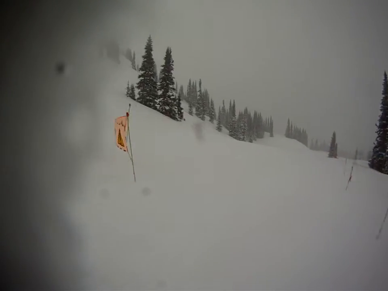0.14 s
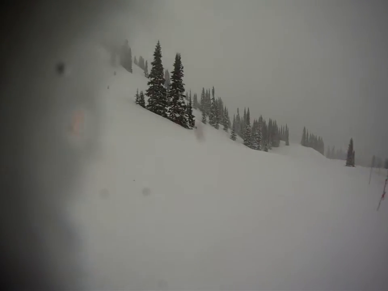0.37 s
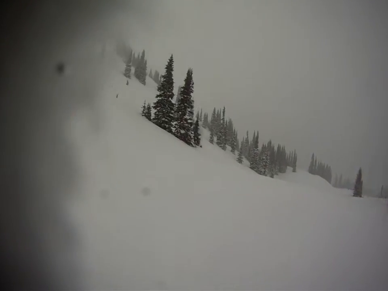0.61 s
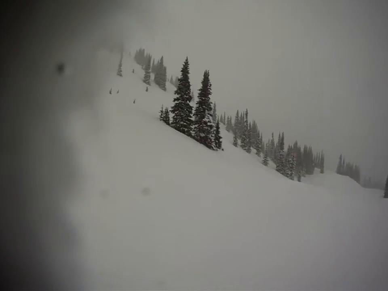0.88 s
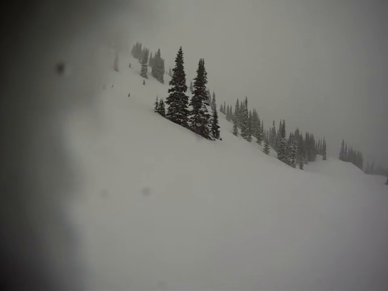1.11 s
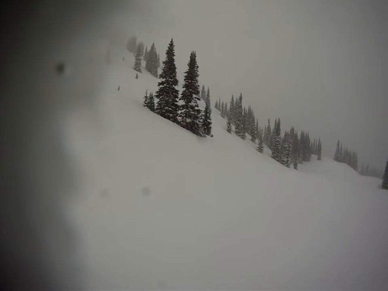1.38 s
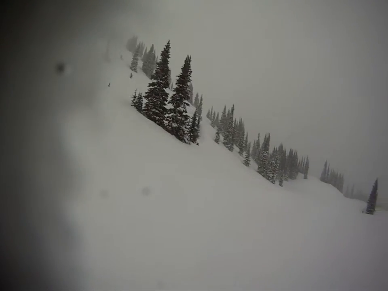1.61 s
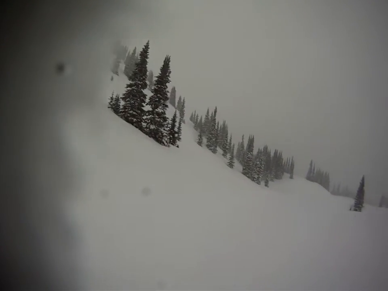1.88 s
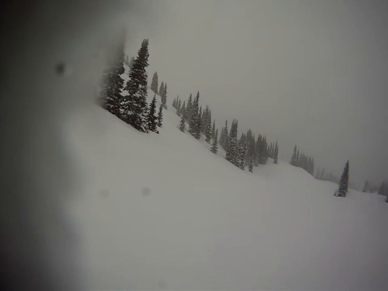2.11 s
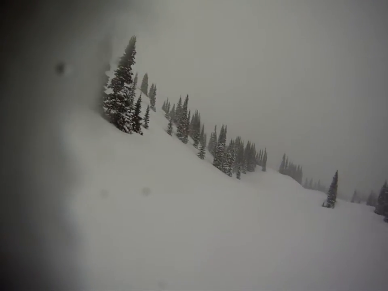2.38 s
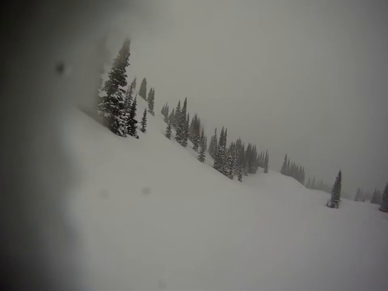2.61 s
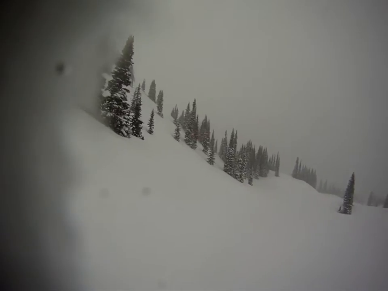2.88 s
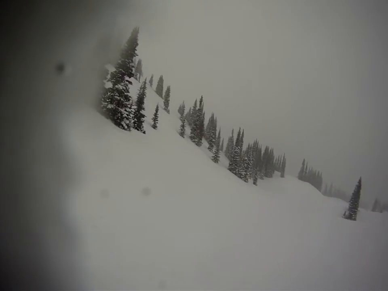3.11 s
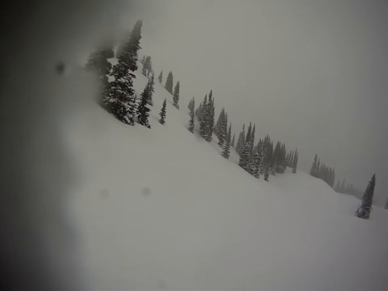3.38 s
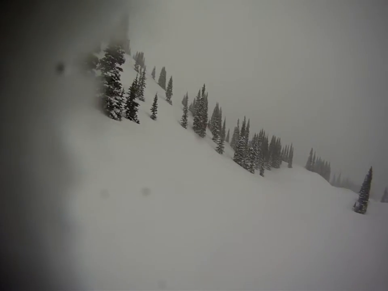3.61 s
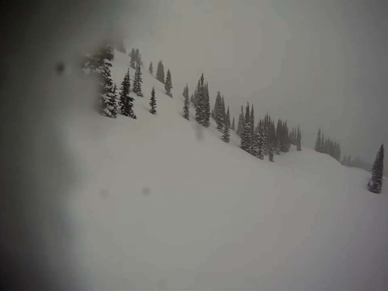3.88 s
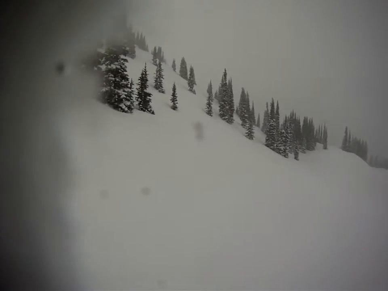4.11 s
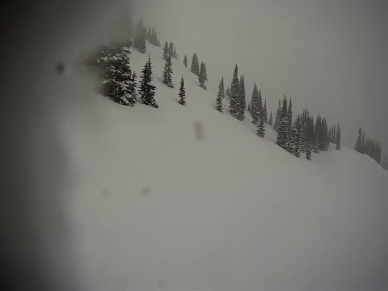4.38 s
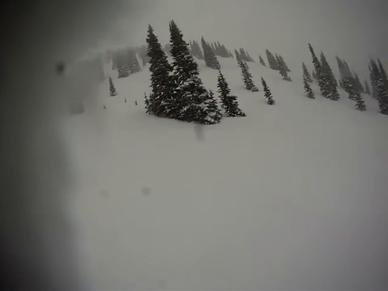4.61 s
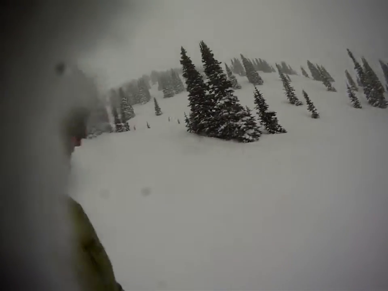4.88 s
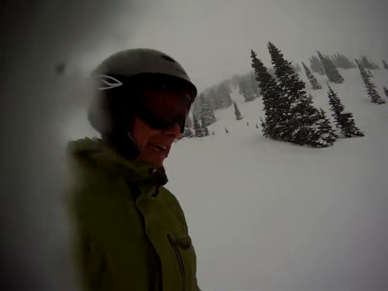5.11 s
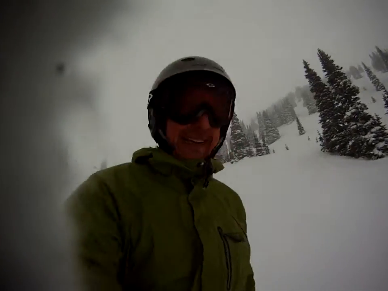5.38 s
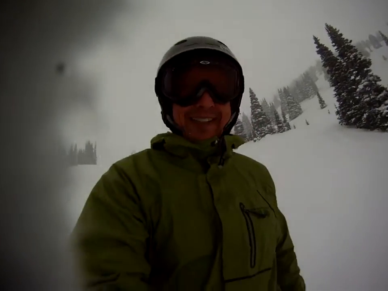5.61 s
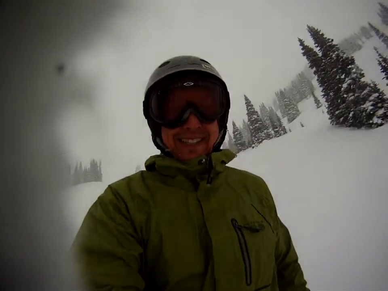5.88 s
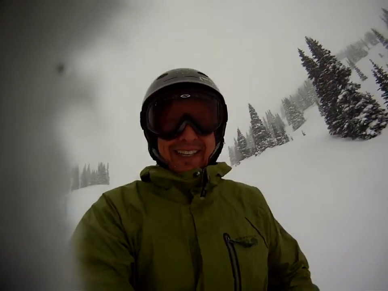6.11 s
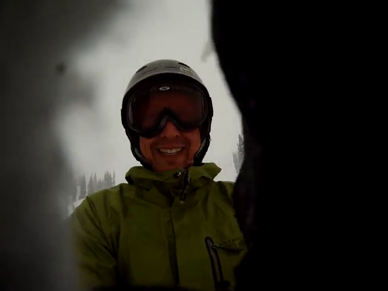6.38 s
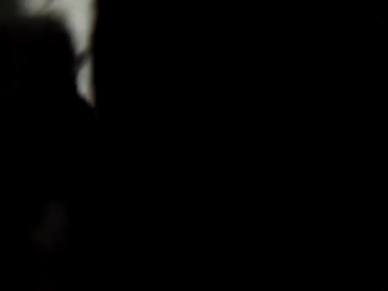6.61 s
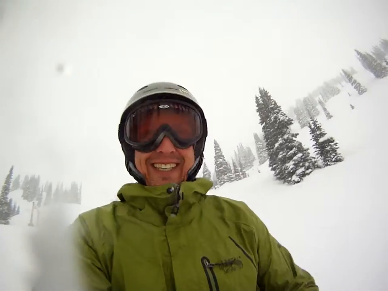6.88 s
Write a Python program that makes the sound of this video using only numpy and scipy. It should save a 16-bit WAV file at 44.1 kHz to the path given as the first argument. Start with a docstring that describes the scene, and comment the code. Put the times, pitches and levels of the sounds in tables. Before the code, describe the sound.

Faint gritty rubbing, small plastic ticks and low wind rumble on an encased camera, then a sudden loud knock and rough glove scrapes.

```python
"""Boxed camera on a snowy slope

A small camera in a closed plastic case is carried down a snowy slope. Snow and a glove rub and tick on the
shell, made from noise and clicks ringing its resonances; late on the glove wipes the lens in noisy strokes.
Wind, and late on the low shake of the wipe, rumble as bands of low noise; a faint frame buzz of regular dips
lies below. The sound chip samples slowly and holds each value, so the shell's resonances return as mirror
images in the treble."""
import sys
import numpy as np
from scipy import signal
from scipy.io import wavfile

SR = 44100
rng = np.random.default_rng(int(sys.argv[2]) if len(sys.argv) > 2 else 0)


def makeup_ratio(level_db):
    """Linear amplitude ratio for a level in decibels (20 dB per factor of ten)."""
    decades = np.asarray(level_db, float) / 20
    return 10 ** decades


def wav_record(signal):
    """Record a signal, one row per channel, as 16-bit PCM in the file named by sys.argv[1]."""
    frames = np.transpose(np.atleast_2d(signal))
    bounded = np.clip(frames, -1, 1)
    # unit amplitude maps onto the largest positive 16-bit level
    quanta = np.round(bounded * 32767).astype(np.int16)
    wavfile.write(sys.argv[1], SR, quanta)


N = 308700   # samples: 7 s

# Steady rubbing on the shell, joined by straight lines: start_s, level_db (rms)
STEADY_RUBBING = [(0, -38.5), (.3, -39), (.6, -41), (.98, -42.5), (1.25, -43), (1.55, -47), (1.93, -50),
                  (2.08, -43.5), (2.3, -46), (2.6, -44), (3.0, -42.5), (3.35, -45), (3.75, -45.5),
                  (4.15, -46.5), (4.4, -50), (5.42, -42.5), (5.5, -45), (5.95, -47.5), (6.4, -42.5),
                  (7, -42.5)]
# The glove leans on the shell and the rubbing jumps up: start_s, length_s, start_level_db, end_level_db
LEANS_ON_SHELL = [(0.775, 0.15, -38, -37), (2.31, 0.1, -50, -42), (3.062, 0.12, -43.5, -40),
                  (3.52, .14, -55, -42), (3.792, 0.25, -44, -40), (4.446, 0.065, -44, -41),
                  (4.507, 0.32, -34.5, -36.5), (4.849, 0.57, -37, -37.5), (5.569, .17, -43.5, -31.5),
                  (5.74, 0.087, -34.5, -44), (6.109, .21, -47, -38.5), (6.495, .11, -37, -31.5),
                  (6.619, 0.15, -26, -20.5)]


def rub_level():
    """Steady rubbing and the leans add in power, as separate noises do; the result is in dB."""
    t = np.arange(N) / SR
    edge_s = 0.005
    power = makeup_ratio(2 * in_time(STEADY_RUBBING)[0])
    for start_s, length_s, start_db, end_db in LEANS_ON_SHELL:
        end_s = start_s + length_s
        on = (np.tanh((t - start_s) / edge_s) - np.tanh((t - end_s) / edge_s)) / 2
        lean_db = np.interp(t, [start_s, end_s], [start_db, end_db])
        power = power + on ** 2 * makeup_ratio(2 * lean_db)
    return 10 * np.log10(power)


def rubbing():
    """Snow dust and cloth on the shell: fluttering hiss, a dense fine crackle and a few larger grains."""
    rub_db = rub_level()
    # above -31 dB the pressure damps the upper modes and hides the crackle
    heavy_db = np.maximum(rub_db + 31, 0)
    # the share of the upper modes wanders as the contact moves
    upper_db = 0.5 + 1.5 * drift(2.7) - 2.5 * heavy_db
    weight_db = 0.37 * np.clip(rub_db + 39.5, -8, 10)

    hiss = rng.standard_normal(N) * makeup_ratio(2.0 * drift(76))
    fine = flakes(1600 * makeup_ratio(6 * drift(40)), spread_db=6.5)
    large = flakes(70 * makeup_ratio(4 * drift(10)), spread_db=6.5)
    ringing = rms_one(shell(hiss, np.clip(upper_db, -20, 6), weight_db, patchy_db=1.15))
    crackle = makeup_ratio(-4.0) * fine + makeup_ratio(-7) * large
    mixed = ringing + makeup_ratio(-1.1 * heavy_db) * crackle
    return makeup_ratio(rub_db) * rms_one(mixed)


# Resonances of the shell, in the order low, main, upper, top and a fifth one:
# pitch_hz, width_hz, level_db (relative, when rubbed, before any lift)
SHELL_MODES = [(1224, 900, -3), (2170, 458, 0.5), (3493, 350, -10), (4804, 1380, -12.5), (1715, 670, -1)]


def shell(drive, upper_db, weight_db, patchy_db):
    """A rubbing force rings all modes, neighbours in opposite sign, each wavering; weight wakes the fifth."""
    out = 0
    # the top mode follows only part of the change in the upper one
    lifts_db = [0, 0, upper_db, 0.44 * upper_db, weight_db]
    signs = [1, 1, -1, 1, -1]
    for (pitch_hz, width_hz, level_db), lift_db, sign in zip(SHELL_MODES, lifts_db, signs):
        ringing = rms_one(mode(drive, pitch_hz, width_hz))
        waver_db = patchy_db * drift(8.5)
        out = out + sign * makeup_ratio(level_db + lift_db + waver_db) * ringing
    return stiff(out)


def flakes(per_s, spread_db):
    """Grains land at different spots, so each rings the modes in its own proportion."""
    hits = grains(per_s, spread_db)
    out = 0
    for pitch_hz, width_hz, level_db in SHELL_MODES:
        struck = contact(hits * rng.standard_normal(N), pitch_hz, spread=1.46)
        # the modes are more even here than when rubbed
        out = out + makeup_ratio(0.32 * level_db) * rms_one(mode(struck, pitch_hz, width_hz))
    return rms_one(stiff(out))


def grains(per_s, spread_db):
    """Stick-slip: random clicks, most small, a few large."""
    sizes = makeup_ratio(spread_db * np.minimum(rng.exponential(1, N), 3.2))
    signs = rng.choice([-1, 1], N)
    landed = rng.random(N) < per_s / SR
    return rms_one(sizes * signs * landed)


# Ticks on the shell: start_s, peak_db (hardest-struck mode, before scatter), spot_hz (pitch of the spot struck),
# fall_below_db_per_octave, fall_above_db_per_octave (how fast the modes weaken away from the spot)
SHELL_TICKS = [(0.1182, -24, 2040, 15, 12), (0.1503, -21, 2300, 15, 12), (0.2209, -24, 2200, 10, 16),
               (0.42, -25, 2290, 12, 8.2), (0.5046, -22.5, 2170, 6.7, 16), (0.6798, -21, 3300, 9, 24),
               (1.026, -29.5, 1980, 5.3, 9.1), (1.1713, -19.5, 3360, 13, 25), (1.2331, -13, 3530, 13.6, 29),
               (1.3988, -33.5, 2070, 7.8, 20), (1.587, -29, 2300, 5.1, 9.4), (1.727, -31, 2240, 10, 8.5),
               (2.2298, -29, 2290, 10, 8), (2.3106, -26, 2310, 15, 4), (2.3281, -25, 2190, 9.4, 7.9),
               (2.3527, -24, 2150, 7.6, 12), (2.37, -27.5, 2290, 8.6, 12), (2.388, -26, 3290, 10, 12),
               (2.4255, -23, 2120, 10, 6.7), (2.666, -28, 2060, 5, 16), (2.7453, -24.5, 3390, 17, 25),
               (2.8974, -27, 2070, 5.5, 11), (3.0397, -23.5, 3200, 6.6, 23), (3.1024, -19.5, 2120, 10, 16),
               (3.1963, -29.5, 1210, 10, 9.9), (3.2716, -22, 2240, 15, 20), (3.292, -30.5, 3280, 8, 22),
               (3.4514, -23, 3260, 4.7, 13), (3.5694, -20, 1960, 14.5, 15.6), (3.8204, -23.5, 3470, 11, 17),
               (3.9947, -26, 2220, 6.2, 12), (4.1026, -23.5, 1120, 10, 8.4), (4.1387, -26, 2050, 11, 8.2),
               (4.5248, -19, 1960, 15, 26), (4.7533, -23.5, 2400, 12, 10), (4.78, -22.5, 2210, 11, 8.4),
               (4.801, -38, 2010, 10, 12), (4.8412, -21, 2270, 8.9, 4.8), (4.8705, -25, 3560, 13, 10),
               (4.9023, -27, 1910, 10, 9.8), (4.9139, -11.5, 1950, 10, 4.2),
               (4.9766, -18.5, 3550, 3.9, 9.8), (5.3637, -18, 2080, 15, 14), (5.5566, -27.5, 2310, 14, 12),
               (5.7359, -11.5, 2280, 17, 9.2), (5.768, -13, 2240, 17, 9.4), (5.9162, -23.5, 2300, 14, 9.6),
               (6.0518, -12, 2260, 15, 10.3), (6.2107, -25.5, 1200, 10, 5.2),
               (6.2559, -21.5, 2110, 14, 8.9), (6.2707, -19, 2070, 14, 7.5), (6.3012, -21.5, 2260, 20, 9.9),
               (6.471, 3, 2130, 9.2, 13), (6.4888, -21, 2020, 11, 9.3), (6.557, -10.5, 2140, 14, 12),
               (6.5638, -11.5, 2110, 13, 8.6), (6.5842, -16.5, 2160, 7.6, 13), (6.6276, -11, 1090, 10, 8.6),
               (6.757, -8, 1820, 10, 15), (6.7623, -21, 1860, 10, 12), (6.766, -9, 1850, 13, 17),
               (6.7707, -15, 2160, 9, 16), (6.837, -20, 2210, 11.5, 16), (0.4628, -21.5, 5000, 3.2, 12),
               (0.5397, -26, 4240, 4, 14), (0.9053, -26.5, 4840, 5, 12), (1.9944, -31, 4830, 4.7, 12),
               (2.2114, -27.5, 4300, 3.4, 12), (3.1472, -26.5, 4210, 4, 13), (4.3944, -28.5, 4770, 4.1, 11)]


def ticks():
    """Each tick strikes the modes near its spot hardest and chatters once."""
    start_s, peak_db, spot_hz, below_db, above_db = np.transpose(SHELL_TICKS)
    at = np.round(start_s * SR).astype(int)
    chatter_at = at + round(0.0007 * SR)
    scatter_db, spread = 0.5, 1.183   # spread: ratio from the mode's pitch to the edge of the driven band
    struck_modes = SHELL_MODES[:4]
    octaves = np.log2(np.array(struck_modes)[:, :1] / spot_hz)
    share_db = np.where(octaves < 0, below_db * octaves, -above_db * octaves)
    share_db = share_db - share_db.max(axis=0)
    unit = np.eye(1, 400)[0]   # a single click
    out = np.zeros(N)
    for (pitch_hz, width_hz, _), mode_share_db in zip(struck_modes, share_db):
        side, chatter, scatter = rng.standard_normal((3, len(at)))
        blow = makeup_ratio(peak_db + mode_share_db + scatter_db * scatter)
        clicks = np.zeros(N)
        clicks[at] = blow * np.sign(side)
        clicks[chatter_at] += 0.25 * blow * np.tanh(chatter)
        free_hz = 0.68 * width_hz   # a free shell rings narrower than a rubbed one
        height = np.abs(mode(contact(unit, pitch_hz, spread), pitch_hz, free_hz)).max()
        out += mode(contact(clicks, pitch_hz, spread), pitch_hz, free_hz) / height
    return stiff(out)


# Strokes of the glove over the shell: peak_s, level_db (rms at the peak), length_s (rise plus fall)
GLOVE_STROKES = [(5.031, -32, 0.012), (5.135, -27, 0.026), (5.248, -33, 0.032), (5.321, -32, 0.017),
                 (5.346, -30, 0.015), (6.471, -11.5, 0.0021), (6.478, -13, 0.0048), (6.536, -28.5, 0.025),
                 (6.637, -14, 0.016), (6.657, -12.5, 0.0096), (6.688, -21.5, 0.019), (6.704, -8.5, 0.0056),
                 (6.725, -11, 0.0044), (6.742, -20, .007), (6.762, -13.5, .018), (6.79, -25.5, 0.0046)]


def stroke_envelope():
    """Pressure of the glove: each stroke swells and dies, rising a little faster than it falls."""
    t = np.arange(N) / SR
    power = np.zeros(N)
    for peak_s, level_db, length_s in GLOVE_STROKES:
        side_s = length_s * np.where(t < peak_s, 0.41, 0.59)
        power += makeup_ratio(2 * level_db) * np.exp(-((t - peak_s) / side_s) ** 2)
    return np.sqrt(power)


def glove():
    """Strokes scrape the shell and, duller and a little later, shake the air inside; squeezes are added."""
    pressure = stroke_envelope()
    # a light touch is brighter, a heavy one damps the upper modes
    upper_db = np.where(pressure < makeup_ratio(-26), 1.5, -8.0)
    rough = rng.standard_normal(N) + 1.54 * grains(900, spread_db=4.5)
    scrape = rms_one(shell(rough, upper_db, 3.2, patchy_db=2.5))

    air_band = signal.butter(1, [40, 600], "band", fs=SR, output="sos")
    shake = rms_one(signal.sosfilt(air_band, rng.standard_normal(N)))
    lag = np.exp(-1 / (0.0046 * SR))   # 4.6 ms
    late_pressure = signal.lfilter([1 - lag], [1, -lag], pressure)
    return pressure * scrape + makeup_ratio(-9.5) * late_pressure * shake + squeezes()


# The glove squeezes the air in the case: middle_s, peak_db, swing_s (from the middle to either peak)
AIR_SQUEEZES = [(6.4732, -8.5, 0.0014), (6.587, -8.5, 0.0015), (6.6273, -6.5, 0.00034)]
# It lets go, one swing: middle_s, peak_db (before the 0.95 below), swing_s
AIR_RELEASE = (6.6315, -3.5, 0.00117)


def squeezes():
    """A squeeze swings the air pressure down, then up; letting go swings it up, then down."""
    t = np.arange(N) / SR
    out = np.zeros(N)
    swings = [(1, row) for row in AIR_SQUEEZES] + [(-0.95, AIR_RELEASE)]
    for direction, (middle_s, peak_db, swing_s) in swings:
        u = (t - middle_s) / swing_s
        out += direction * makeup_ratio(peak_db) * u * np.exp(0.5 - u ** 2 / 2)
    return out


# Colour of the low rumble: pitch_hz, level_db (relative, per Hz)
RUMBLE_COLOUR = [(15, -41), (25, 0.5), (81, -0.5), (156, -6), (407, -16), (697, -21), (900, -22),
                 (1170, -57), (1980, -120)]
# Low rumble on the case, joined by straight lines: wind, and at 6.65 s the low shake of the glove's wipe:
# start_s, level_db
RUMBLE_LEVEL = [(0.0, -43.5), (0.6, -43.5), (1.56, -47), (2.57, -46), (3.8, -47.5), (5.24, -41),
                (5.48, -46), (6.2, -44), (6.47, -41.5), (6.65, -33), (6.78, -39.5), (7.0, -46)]
# Deep swells of the rumble: wind buffets, and last the low shake of the glove's wipe:
# middle_s, deep_lift_db, length_s (from the middle to 1/e of the lift)
DEEP_SWELLS = [(.2, 2.5, 0.34), (2.62, 7, 0.26), (3.047, 6, 0.07), (5.25, 4, 0.17), (6.703, 12, 0.055)]


def rumble():
    """Half-octave bands of low noise, lumpy together and each on its own; swells lift the deepest bands."""
    t = np.arange(N) / SR
    deep_db = -3   # between swells
    for middle_s, lift_db, length_s in DEEP_SWELLS:
        deep_db = deep_db + lift_db * np.exp(-((t - middle_s) / length_s) ** 2)

    shared_lumps = drift(10)
    edges_hz = 18 * 2 ** np.arange(0, 6.6, 0.5)
    white = rng.standard_normal((2, N))   # neighbouring bands take different noise
    pitch_hz, colour_db = np.transpose(RUMBLE_COLOUR)
    out = 0
    for k, (low, high) in enumerate(zip(edges_hz, edges_hz[1:])):
        band_filter = signal.butter(2, [low, high], "band", fs=SR, output="sos")
        band = signal.sosfilt(band_filter, white[k % 2])
        level_db = np.interp(np.log(low * high) / 2, np.log(pitch_hz), colour_db)
        level_db = level_db + deep_db * (high < 110)
        lumps_db = 0.5 * (shared_lumps + 0.72 * drift(3.8))
        out = out + makeup_ratio(level_db + lumps_db) * band
    rumble_db, = in_time(RUMBLE_LEVEL)
    return makeup_ratio(rumble_db) * rms_one(out)


def frame_buzz():
    """The picture circuit pulls the supply down once a field; odd and even fields differ."""
    fields_per_s, first_s, width_s = 59.94, 0.01654, 0.00056
    field = (np.arange(N) / SR - first_s) * fields_per_s
    nearest = np.round(field)
    dip = np.exp(-((field - nearest) / fields_per_s / width_s) ** 2 / 2)
    dip *= 1 + 0.96 * (-1) ** nearest
    high_pass = signal.butter(1, 90, "high", fs=SR, output="sos")
    return signal.sosfilt(high_pass, -makeup_ratio(-41.5) * dip)


def mode(x, pitch_hz, width_hz):
    """One resonance: a click rings and dies, faster when the width is larger."""
    r = np.exp(-np.pi * width_hz / SR)
    w = 2 * np.pi * pitch_hz / SR
    return signal.lfilter([0, np.sin(w)], [1, -2 * r * np.cos(w), r * r], x + 1e-18)


def contact(clicks, pitch_hz, spread):
    """A contact lasts a few cycles of the mode that it drives, so little spills beside the mode."""
    edges_hz = [pitch_hz / spread, min(pitch_hz * spread, 7000)]
    band = signal.butter(2, edges_hz, "band", fs=SR, output="sos")
    return signal.sosfilt(band, clicks + 1e-18)


def stiff(x):
    """The shell is too stiff to move below its lowest mode, so the lows are cut."""
    return signal.sosfilt(signal.butter(4, 1004, "high", fs=SR, output="sos"), x)


def drift(rate_hz):
    """Slow chance: noise twice through a one-pole low-pass, scaled to rms 1."""
    r = np.exp(-20 * np.pi * rate_hz / SR)   # made at a tenth of the sample rate
    noise = rng.standard_normal(N // 10 + 4002)
    slow = signal.lfilter([1], [1, -2 * r, r * r], noise)[4000:]   # skip the run-in
    return np.interp(np.arange(N) / 10, np.arange(len(slow)), rms_one(slow))


def rms_one(x):
    """Scale to rms 1."""
    return x / np.sqrt(np.mean(x ** 2) + 1e-20)


def in_time(rows):
    """Table columns as straight lines in time."""
    start_s, *columns = np.transpose(rows)
    return [np.interp(np.arange(N) / SR, start_s, column) for column in columns]


def scene():
    """Shell, glove, rumble and buzz add up in one microphone."""
    mixed = rubbing() + ticks() + glove() + rumble() + frame_buzz()
    return mixed[None]


def top_cut(x):
    """Nothing passes above the cut-off."""
    return signal.sosfilt(signal.butter(12, 16340, fs=SR, output="sos"), x)


def record(dry):
    """Overload, guard filter, 12000 samples a second each held four times, treble cut."""
    loud = np.clip(dry, -1, 1)
    guard = signal.cheby2(4, 22.0, 6808.5, fs=SR, output="sos")   # 22 dB down from 6808.5 Hz
    guarded = signal.sosfilt(guard, loud)
    # up to 48000 a second, then every fourth value; the guard lets some treble fold back
    slow = signal.resample_poly(guarded, 160, 147, axis=1)[:, ::4]
    # holding leaves mirror images of the sound in the treble
    held = np.repeat(slow, 4, axis=1)
    x = signal.resample_poly(held, 147, 160, axis=1)[:, :N]
    treble_cut = signal.cheby2(12, 24.0, 15500, fs=SR, output="sos")
    x = signal.sosfilt(treble_cut, x)
    return top_cut(np.clip(x, -1, 1))


dry = scene()
out = record(dry)
wav_record(out)
```